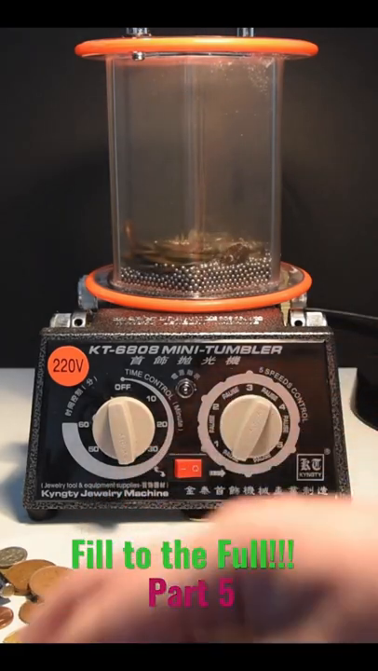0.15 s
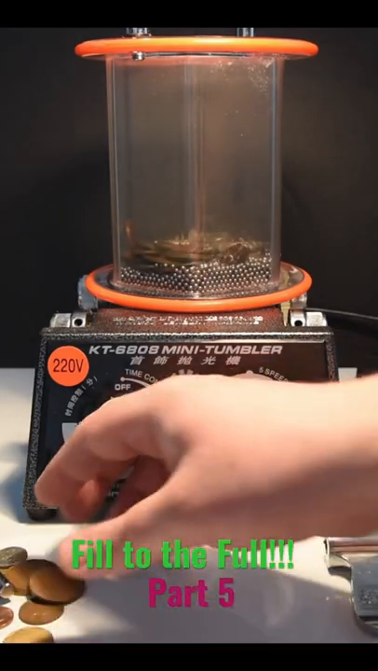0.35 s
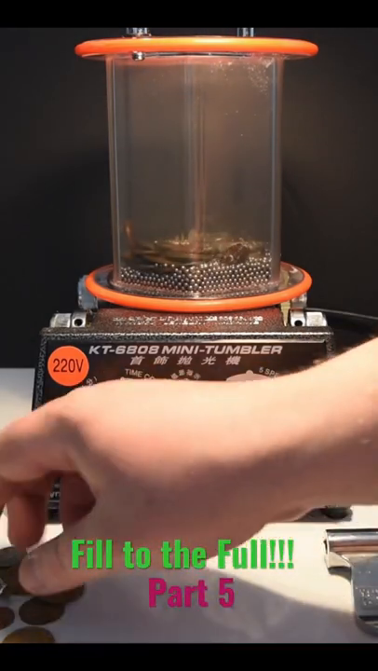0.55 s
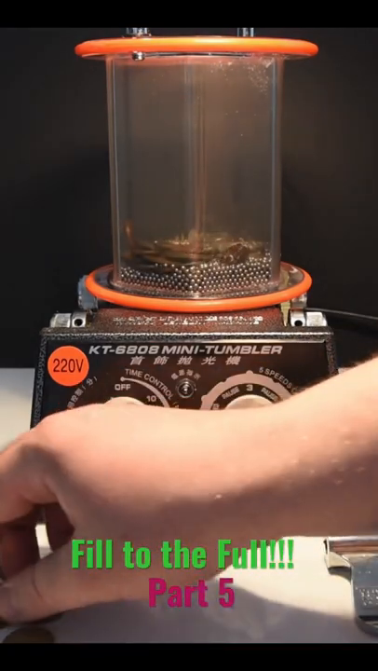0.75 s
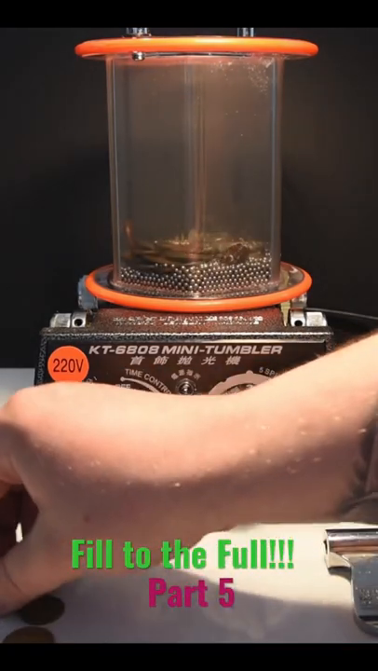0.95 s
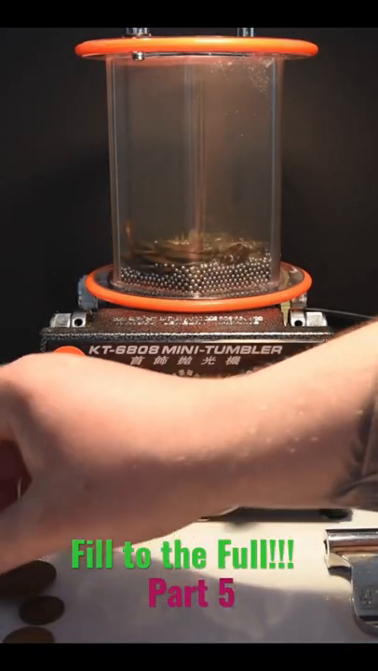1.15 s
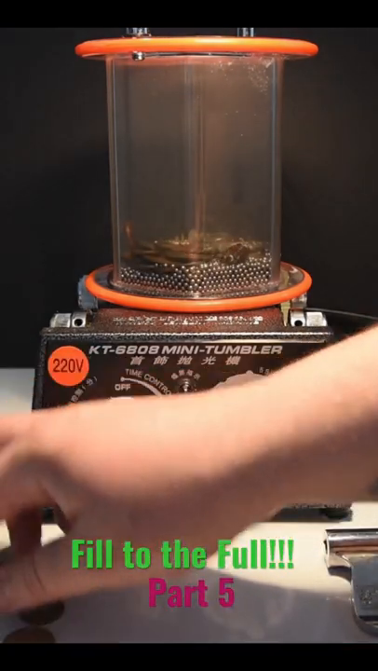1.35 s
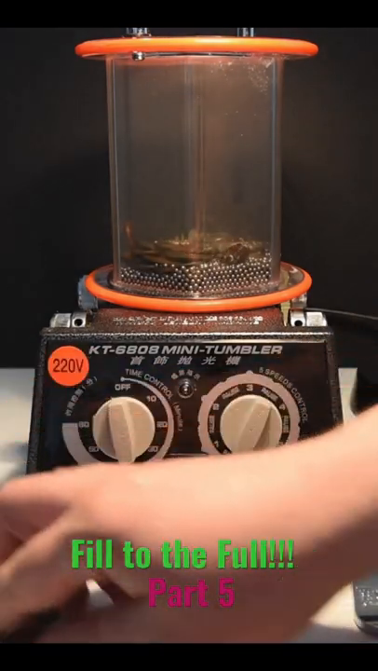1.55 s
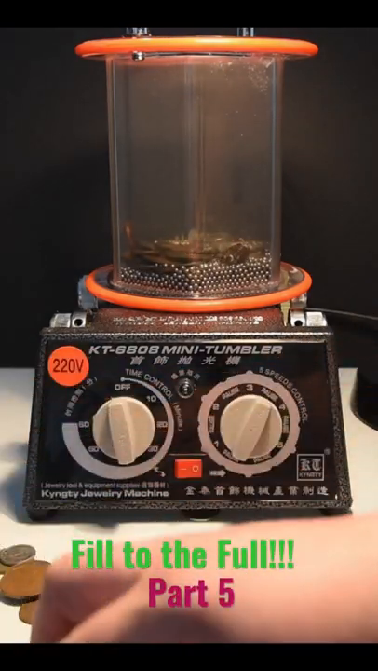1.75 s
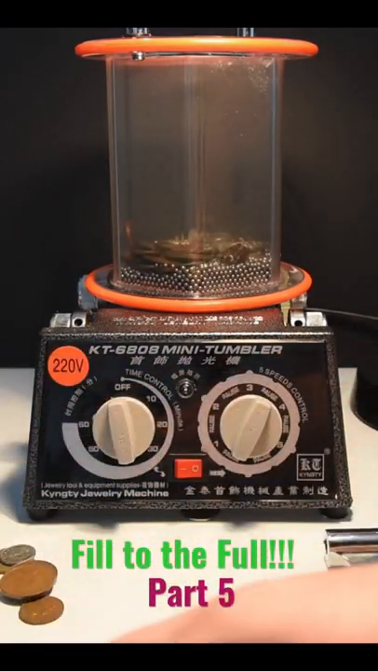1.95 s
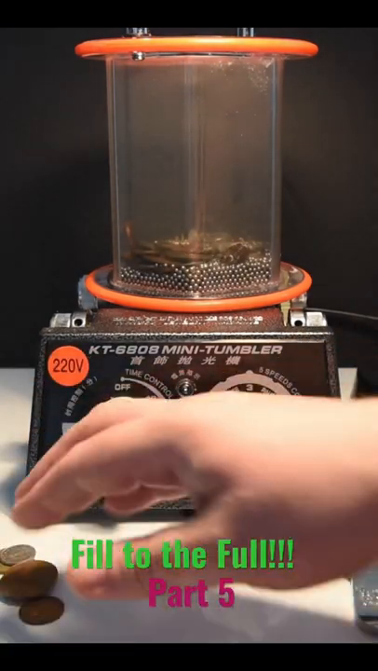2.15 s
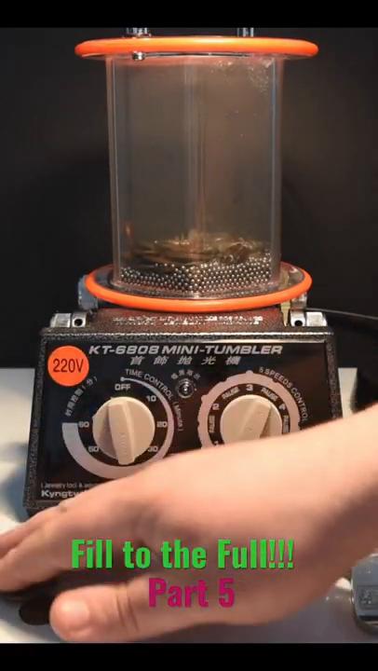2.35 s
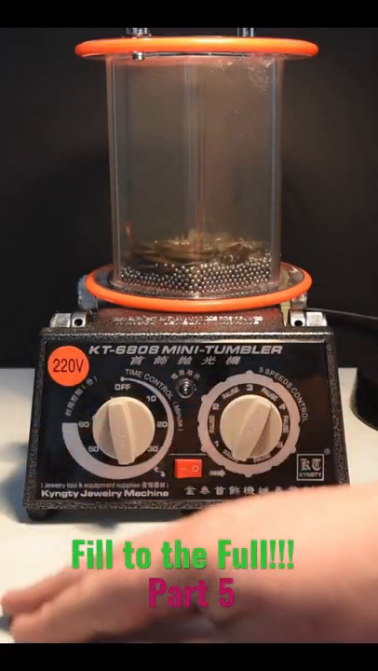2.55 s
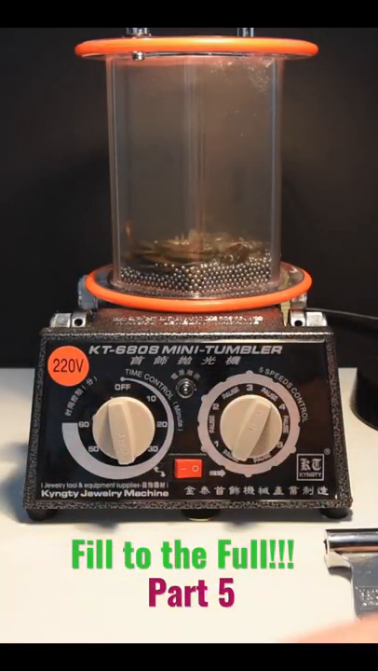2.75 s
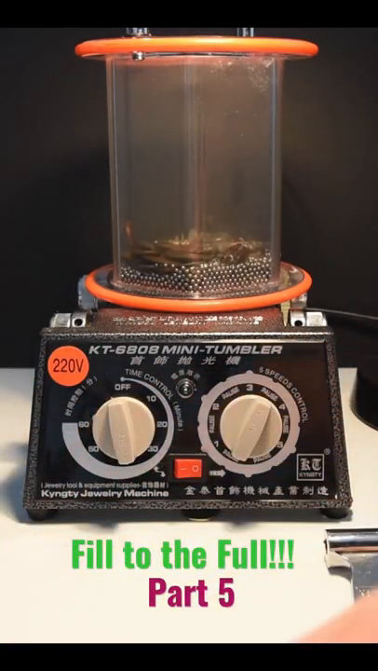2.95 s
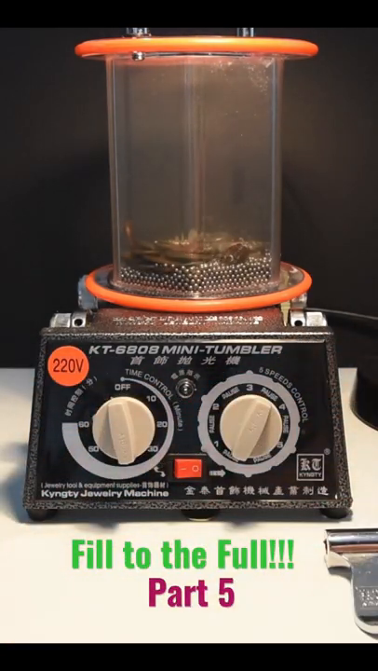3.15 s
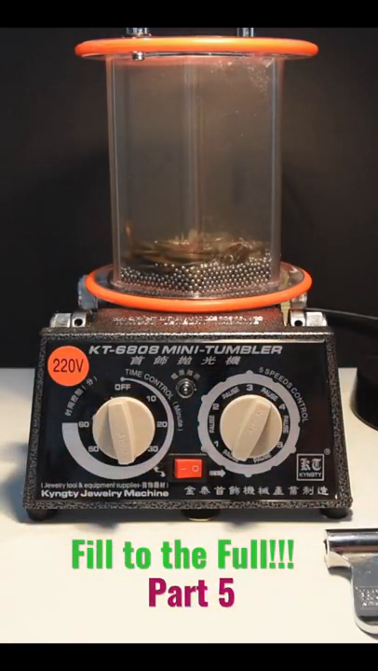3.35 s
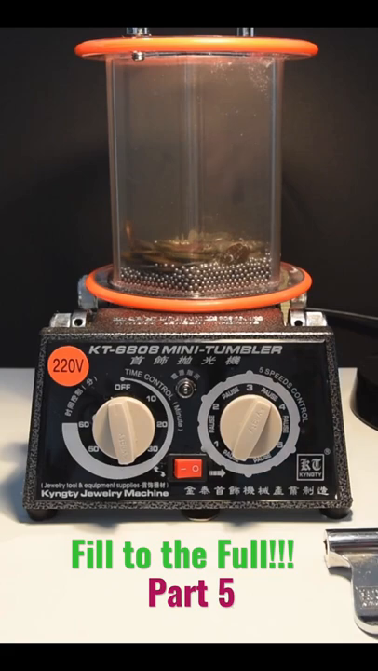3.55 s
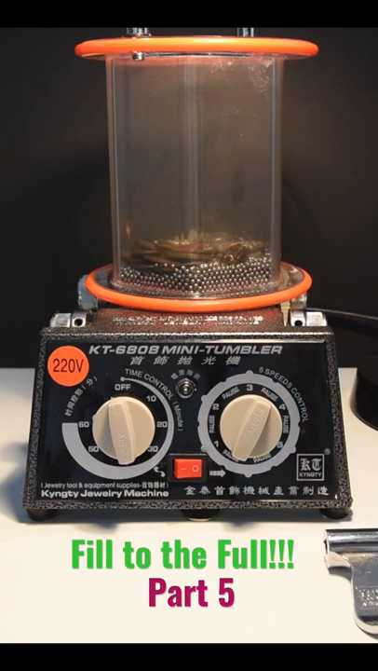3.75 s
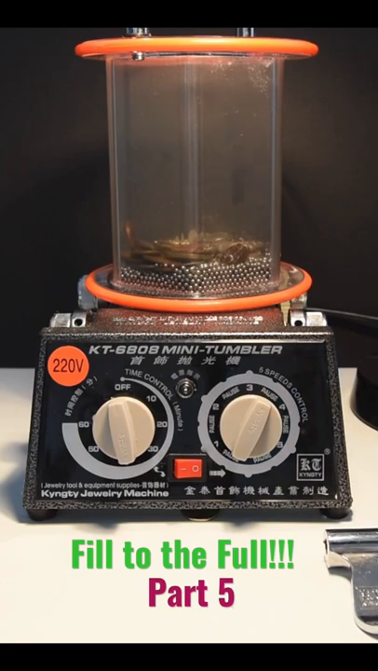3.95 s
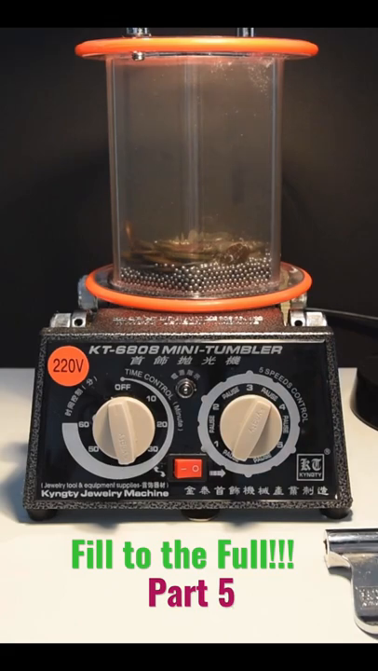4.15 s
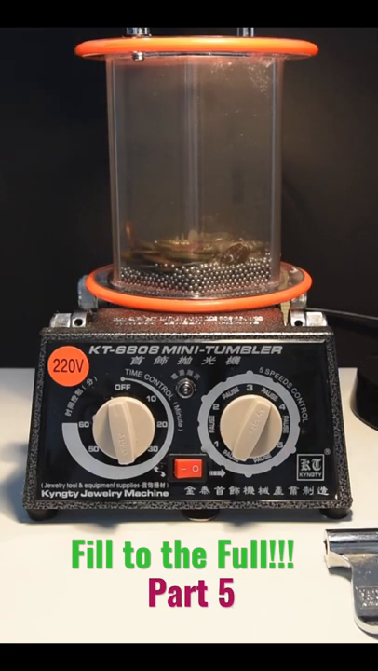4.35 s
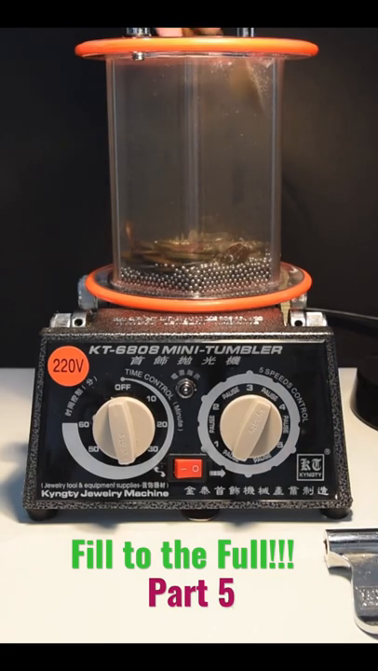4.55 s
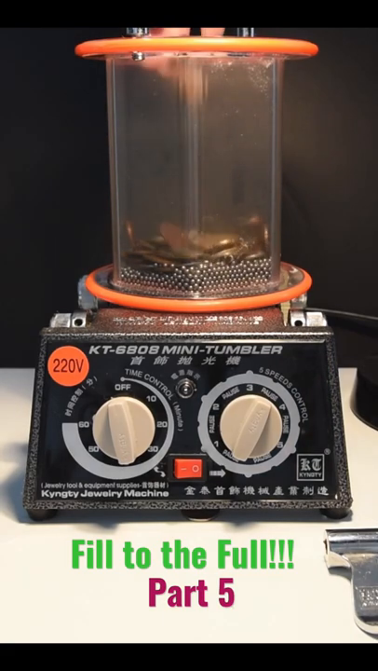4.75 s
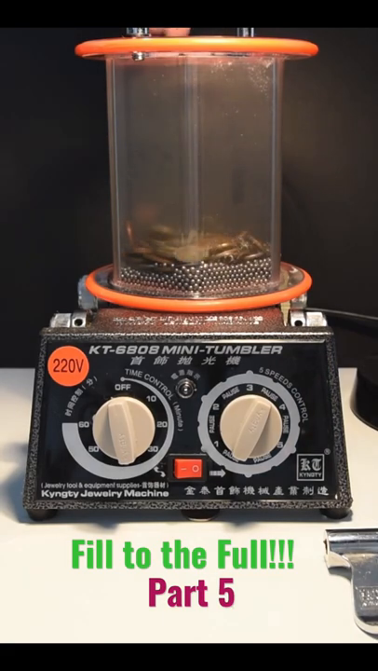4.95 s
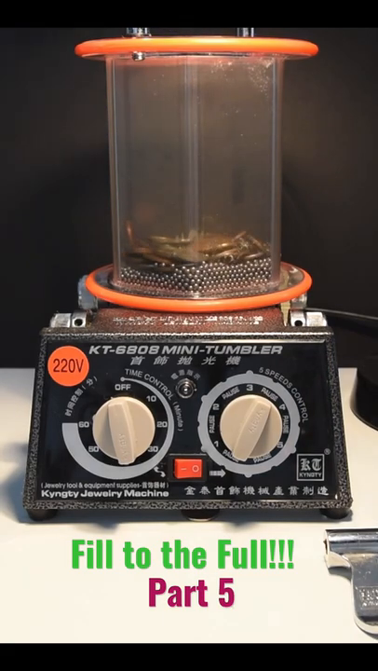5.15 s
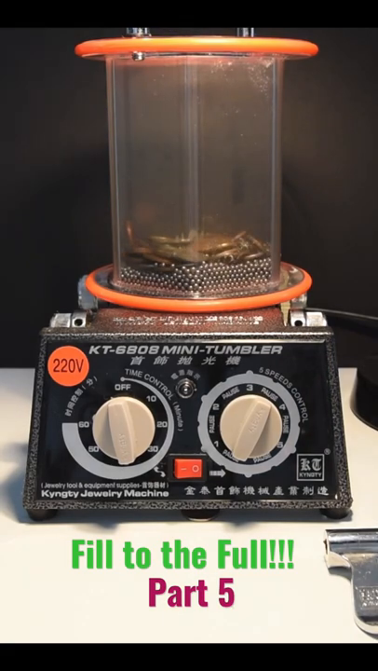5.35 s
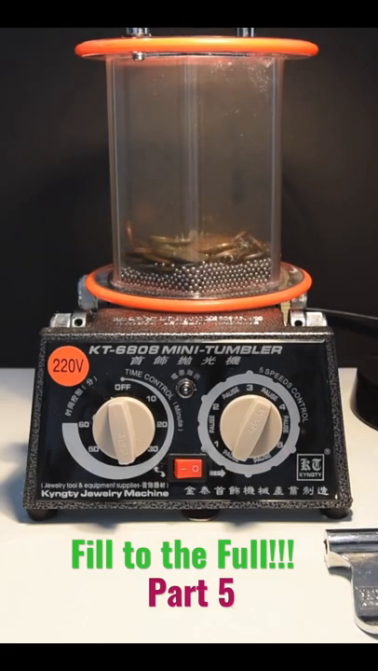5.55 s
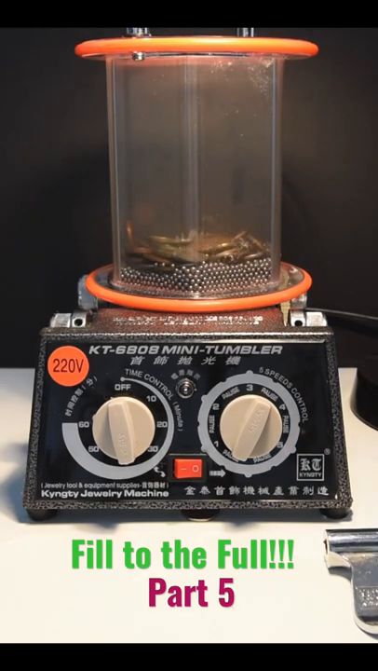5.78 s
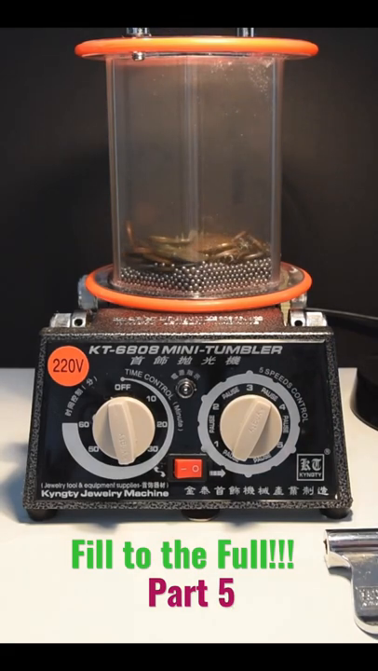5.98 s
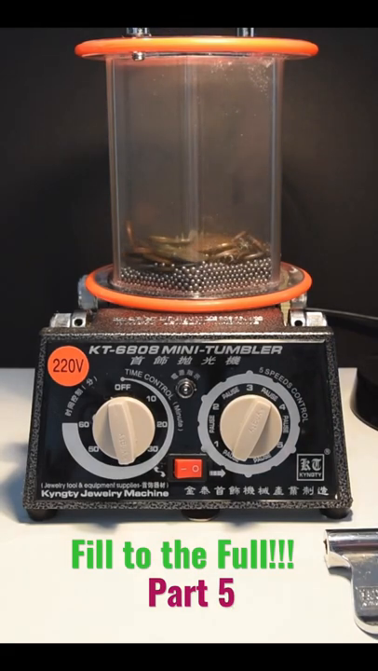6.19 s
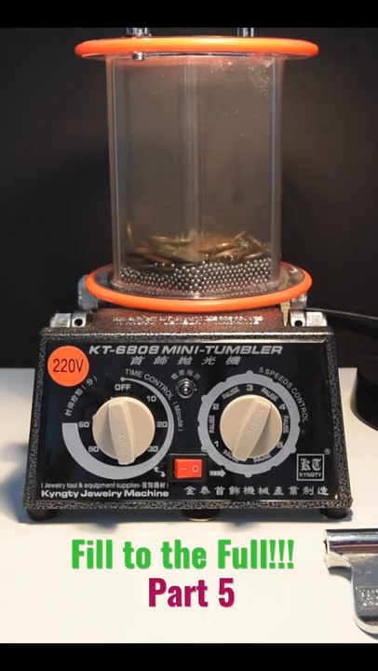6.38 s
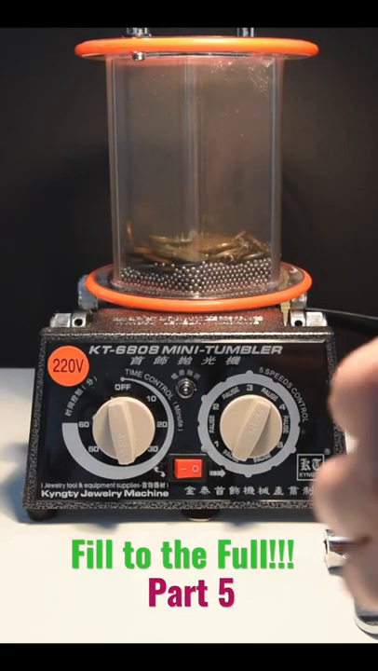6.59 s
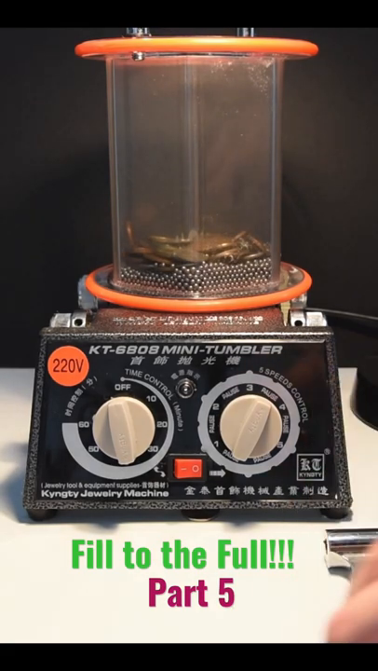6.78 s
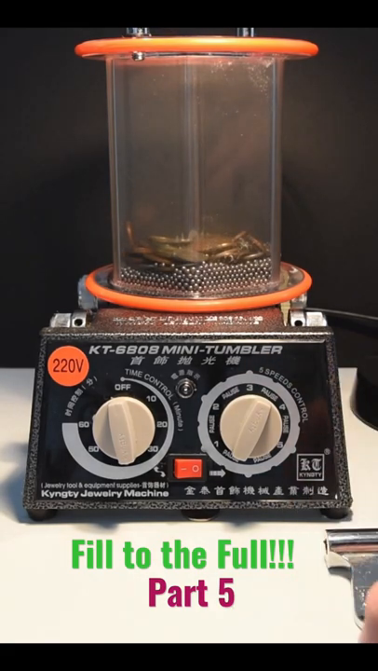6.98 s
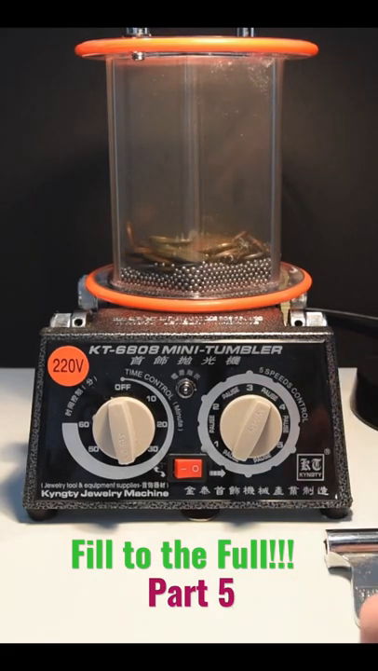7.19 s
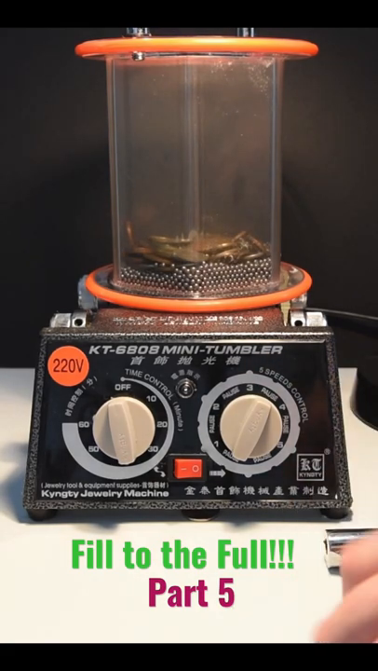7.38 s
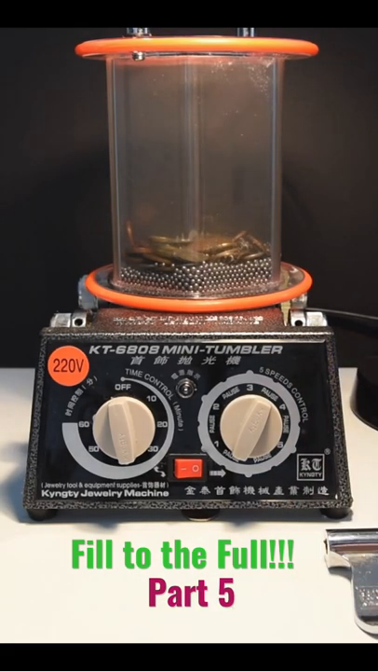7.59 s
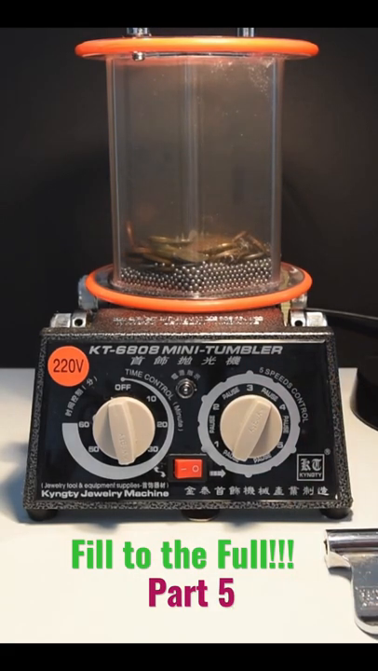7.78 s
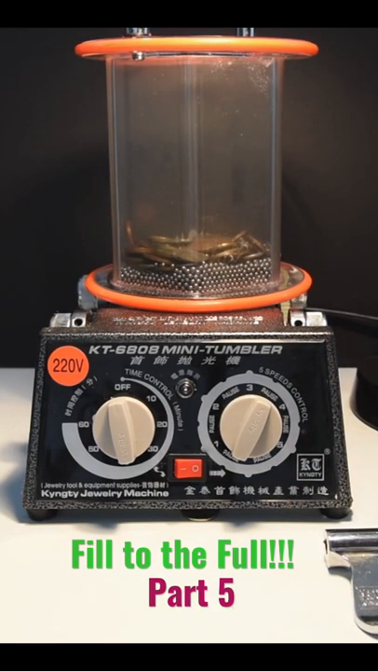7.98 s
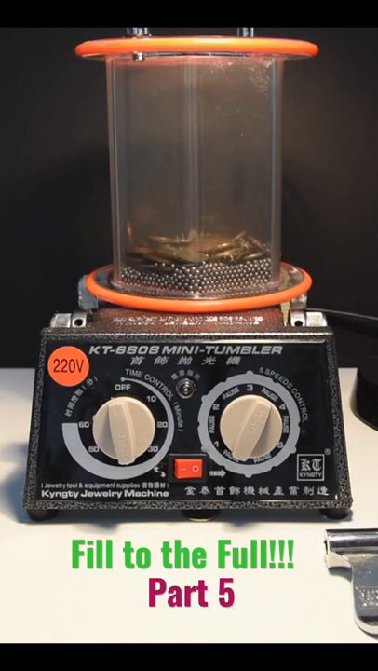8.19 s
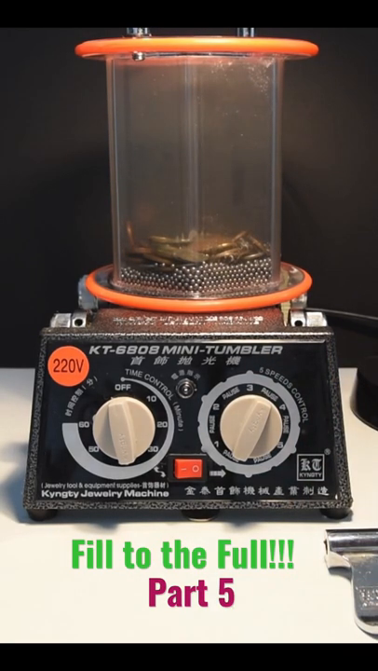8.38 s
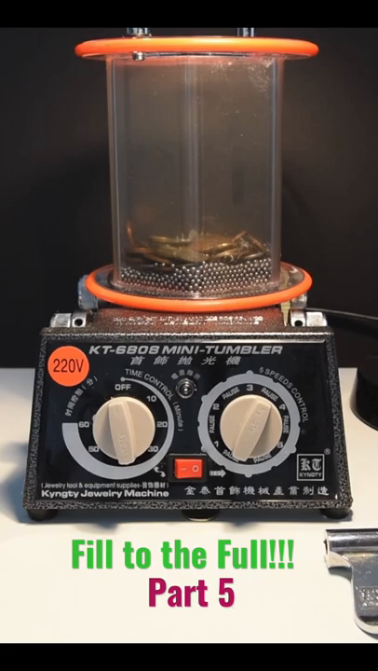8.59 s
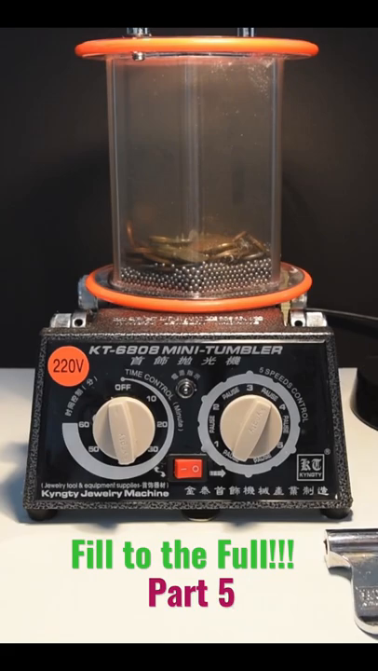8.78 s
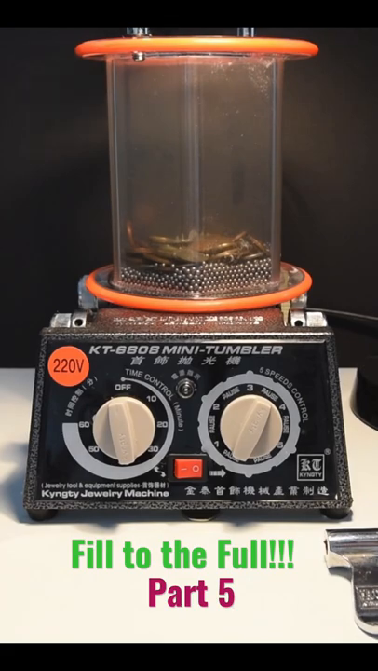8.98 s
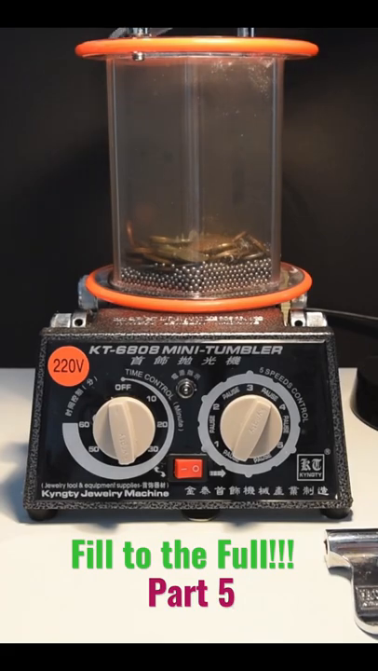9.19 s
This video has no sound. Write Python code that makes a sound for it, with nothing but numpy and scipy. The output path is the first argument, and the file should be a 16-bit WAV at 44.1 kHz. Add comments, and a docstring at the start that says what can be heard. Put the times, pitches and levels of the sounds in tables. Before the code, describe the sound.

Coins clink and scrape on a desk among hand knocks, jingle in the hand, then pour clattering onto metal pellets in a plastic barrel.

```python
"""Coins scrape together on a desk, jingle in a hand and pour onto steel pellets in a plastic barrel,
among knocks on the desk, over a low rumble from outside, microphone hiss and a thin whine.
Coins, desk and barrel are sums of dying modes excited by blows or random grains; cracks, thuds and
rubbing are coloured noise. A small quiet room adds a tail; a close microphone pair hears it all."""
import sys
import numpy as np
from scipy import signal
from scipy.io import wavfile
from scipy.ndimage import uniform_filter1d

SR = 44100
rng = np.random.default_rng(int(sys.argv[2]) if len(sys.argv) > 2 else 0)


def to_wav(sig):
    """Store sig (one row per channel, or 1-D mono) as 16-bit WAV at the path in sys.argv[1].

    Samples outside -1..1 are clipped; the rate is SR.
    """
    pcm = np.clip(np.atleast_2d(sig), -1, 1) * 32767
    pcm = np.round(pcm).astype(np.int16)
    wavfile.write(sys.argv[1], SR, pcm.T)  # frames by channels


N = 407029  # samples


def gain_of(db):
    """Decibel law: amplitude is ten to the power dB / 20."""
    return 10 ** (np.asarray(db) / 20)


def evened(x):
    """Power normalisation: scale to rms 1."""
    return x / np.sqrt(np.mean(x ** 2) + 1e-20)


def read(points, hz):
    """Logarithmic pitch scale: interpolate a curve over log frequency."""
    f, value = np.transpose(points)
    return np.interp(np.log(hz + 1), np.log(f + 1), value)


def add(mix, s, sound, pan_db):
    """Superposition: add a sound at s seconds, with a level difference between the sides."""
    part = mix[:, round(s * SR):][:, :sound.shape[1]]
    part += sound[:, :part.shape[1]] * gain_of([[pan_db / 2], [-pan_db / 2]])


def causal(points):
    """Minimum phase: the response with this spectrum whose energy comes earliest, energy 1."""
    log_gain = np.log(gain_of(read(points, abs(np.fft.fftfreq(2048, 1 / SR)))))
    h = np.fft.ifft(np.exp(np.conj(signal.hilbert(log_gain)))).real[:1024]
    return h / np.linalg.norm(h)


def ring(hz, db, t60, t, lag=0):
    """Modal superposition: a sum of exponentially dying sines; lag shifts their phases."""
    envelopes = gain_of(db[:, None] - 60 * t / t60[:, None])
    return (envelopes * np.sin(2 * np.pi * hz[:, None] * t + lag)).sum(0)


def nearest(hz, near_hz, fall_db):
    """Selective excitation: a blow that favours one pitch drives distant modes less, in dB."""
    return -fall_db * abs(np.log2(hz / near_hz)) ** .5


def grains(per_s, spread_db):
    """Shot noise: sparse clicks of random sign on two sides; a few are large."""
    size = gain_of(spread_db * np.minimum(rng.exponential(1, (2, N)), 4))
    size = size * rng.choice([-1., 1.], (2, N))
    return size * (rng.random((2, N)) < per_s / SR)


def spread(x, cross):
    """Crosstalk: each side also hears a share of the other; rms 1."""
    return evened(x + cross * x[::-1])


def burst(colour, noise, t60, same):
    """Transient contact noise: coloured, partly alike on two sides, dying fast, peak 1."""
    pair, same = noise.reshape(2, -1), np.clip(same, 0, 1)
    pair = np.array([pair[0], same * pair[0] + np.sqrt(1 - same ** 2) * pair[1]])
    t = np.arange(pair.shape[1]) / SR
    x = signal.oaconvolve(pair * gain_of(-60 * t / t60), causal(colour)[None])[:, :len(t)]
    return x / abs(x).max()


def gestures(rows, rise_s, fade_db_per_s, column=None):
    """Power addition of overlapping gestures: rise, even drift, fade; column adds its dB."""
    t, power = np.arange(N) / SR, np.zeros(N)
    for row in rows:
        start, length, level_db, change_db = row[:4]
        since = t - start
        db = level_db + change_db * np.clip(since / max(length, 1e-3), 0, 1)
        db = db - fade_db_per_s * np.maximum(since - length, 0)
        share_db = row[column] if column else 0
        power += (np.clip(since / max(rise_s, 1e-4), 0, 1) * gain_of(db + share_db)) ** 2
    return np.sqrt(power)


# Likeness of the two sides. Each row: frequency in Hz, left-right correlation.
LIKENESS = [(60, 0.94), (180, 0.989), (550, 0.69), (1650, 0.42), (4970, -0.25), (15000, 0.16)]


def wash(points, patchy_db):
    """Partly coherent noise: random short-time spectra with drifting patches, rms 1."""
    frames, hz = N // 512 + 5, np.fft.rfftfreq(2048, 1 / SR)
    a, b, c, d, patches = rng.standard_normal((frames, 1025, 5)).T
    patches = evened(uniform_filter1d(uniform_filter1d(patches, 16, 0), 6, 1))
    same = np.clip(read(LIKENESS, hz), -1, 1)[:, None]
    left = a + 1j * b
    z = np.array([left, same * left + np.sqrt(1 - same ** 2) * (c + 1j * d)])
    z *= gain_of(read(points, hz)[:, None] + patchy_db * patches)
    return evened(signal.istft(z, nperseg=2048, noverlap=1536)[1][:, :N])


# Spectra of hiss and rumble. Each row: frequency in Hz, relative density in dB.
HISS_SPECTRUM = [(15, -44), (25, -21), (48, -5), (111, -6.5), (146, 3), (207, -10), (377, -11),
                 (597, -34.5), (783, -34.5), (1210, -20), (3040, -24.5), (7640, -23), (10000, -16.5),
                 (14700, -39.5), (16300, -50)]
RUMBLE_SPECTRUM = [(15, -36.5), (25, -1), (102, -18.5), (136, 0.5), (204, -8), (238, -5.5), (364, -13.5),
                   (624, -10.5), (728, -11), (936, -9.5), (1200, -18), (1500, -22.5), (3250, -43),
                   (5500, -120)]
# Swell of the rumble. Each row: time in seconds, level in dB.
RUMBLE_SWELL = [(0.0, -58), (1.0, -49.5), (1.85, -54), (2.3, -61), (4.5, -67), (6.042, -69), (7.6, -60.5),
                (8.601, -53.5), (9.23, -54.5)]
# Whine of electronics. Each row: frequency in Hz, bandwidth in Hz, a level in dB that is not used.
WHINE_BAND = [(10200, 78, 0)]
HISS_DB, WHINE_DB = -63.5, -79.5


def background():
    """Stationary noise, hiss and a narrow-band whine, under a rumble that swells and fades."""
    hz, width, _ = WHINE_BAND[0]
    resonance = signal.iirpeak(hz, hz / max(width, 5), SR)
    whine = signal.lfilter(*resonance, rng.standard_normal((2, N)))
    swell_db = np.interp(np.arange(N) / SR, *np.transpose(RUMBLE_SWELL))
    rumble = gain_of(swell_db) * wash(RUMBLE_SPECTRUM, 2.0)
    hiss = gain_of(HISS_DB) * wash(HISS_SPECTRUM, 1.8)
    return hiss + gain_of(WHINE_DB) * spread(whine, .3) + rumble


# Reverberation. Each row: frequency in Hz, time to fall by 60 dB in seconds.
ROOM_DECAY = [(150, 0.58), (600, 0.23), (2000, 0.39), (6000, 0.35), (15000, 0.28)]


def room(x):
    """Diffuse reverberation: random taps, one in every 20 samples, each band dying at its own speed."""
    taps = np.zeros((2, SR // 2))
    at = np.arange(120, SR // 2 - 20, 20) + rng.integers(0, 20, (2, (SR // 2 - 121) // 20))
    np.put_along_axis(taps, at, rng.choice([-1., 1.], at.shape), 1)
    hz, t, z = signal.stft(taps, SR, nperseg=256)
    tail = signal.istft(z * gain_of(-60 * t / read(ROOM_DECAY, hz)[:, None]), SR, nperseg=256)[1]
    low = signal.sosfiltfilt(signal.butter(2, 600, fs=SR, output="sos"), tail)
    tail = tail - low + low[0]  # long waves reach both ports alike
    return signal.oaconvolve(x.mean(0)[None], tail / np.linalg.norm(tail[0]), axes=1)[:, :N]


# Taps of a metal tool rocking on the desk. Each row: start in seconds, level in dB before an offset.
TAPS = [(7.3156, -11.5), (7.369, -26), (9.1165, -14), (9.1393, -23)]
# Modes of the tool. Each row: frequency in Hz, relative level in dB, 60 dB decay time in seconds.
TOOL_MODES = [(1120, -14, 0.035), (2040, -16, 0.028), (2994, 1, 0.02), (3957, -12, 0.047),
              (4460, -0.5, 0.017), (5600, -12, 0.035), (7070, -0.5, 0.02)]


def tool():
    """Modes of a stiff body: short rings, a little different at each tap."""
    out, t = np.zeros((2, N)), np.arange(round(.1 * SR)) / SR
    hz, db, t60 = np.transpose(TOOL_MODES)
    for (s, level_db), luck in zip(TAPS, rng.standard_normal((len(TAPS), len(TOOL_MODES)))):
        tone = ring(hz, db - 17.0 + 0.28 * luck, t60, t)
        add(out, s, gain_of(level_db) * np.array([tone, tone]), -3.0)
    return out


# Blows on the desk. Each row: start in seconds, level in dB, favoured frequency in Hz, then
# thud and slap in dB over that level, and boom of the whole desk in dB before an offset.
BLOWS = [(0.655, -25.5, 614, -13.5, 7.5, -37), (0.674, -38, 604, -25, 8, -27),
         (0.757, -25, 676, -10, -0.5, -38), (0.868, -29, 676, -9, 4, -33),
         (1.144, -12.5, 248, -10.5, -3, -18), (1.422, -26, 664, -7, 8.5, -32),
         (1.507, -25, 580, -14, 1.5, -26), (1.873, -21, 690, -20.5, 2, -42),
         (2.375, -20.5, 720, -18.5, -3.5, -27), (3.278, -22.5, 615, -7.5, -2.5, -27),
         (3.496, -45, 780, -9.5, -2, -12), (3.526, -44.5, 357, 1.5, 0, -12),
         (6.341, -16.5, 467, -2.5, -11, -25), (7.3137, -17, 357, -12.5, -0.5, -37),
         (7.37, -37.5, 272, -2.5, 8.5, -19), (7.576, -15, 360, -13, -26, -12),
         (8.249, -42.5, 578, -0.5, 5.5, -18), (9.117, -22.5, 440, -6.5, 4.5, -27),
         (9.14, -34, 426, -9.5, -8, -26)]
# Modes of the desk. Each row: frequency in Hz, relative level in dB, decay time in seconds before scaling.
DESK_MODES = [(144, 0, 0.21), (186, -2.5, 0.11), (280, -10, 0.058), (312.4, 10, 0.18), (385.3, 17, 0.085),
              (429.5, 8, 0.085), (550, 0, 0.068), (615, 15, 0.051), (788, 23, 0.028), (1101, 20, 0.092),
              (2070, -39, 0.054), (3100, 5, 0.059)]
# Spectra of thud and slap. Each row: frequency in Hz, relative density in dB.
THUD_SPECTRUM = [(59, -24.5), (100, -21), (156, -5.5), (305, -9.5), (444, -7), (705, -8.5), (822, -11),
                 (1140, -14), (6000, -32.5), (7800, -85.5), (13200, -120)]
SLAP_SPECTRUM = [(880, -62.5), (1500, -21), (2300, 11), (4780, 0.5), (9060, 4.5), (14600, -11),
                 (15400, -15.5), (16300, 7.5)]
RING_LENGTH, LINGER_PER_THUD = 1.45, 0.031  # a fleshy blow that thuds more lasts longer


def knocks():
    """Impact on a plate: slap of contact noise, dense thud, and the modes nearest the blow's pitch."""
    out, t = np.zeros((2, N)), np.arange(round(.3 * SR)) / SR
    hz, db, t60 = np.transpose(DESK_MODES)
    draws = rng.standard_normal((len(BLOWS), len(DESK_MODES) + 32000))
    for (s, level_db, near_hz, thud_db, slap_db, boom_db), draw in zip(BLOWS, draws):
        luck, low, high = np.split(draw, [len(hz), len(hz) + 20000])
        length = max(RING_LENGTH + LINGER_PER_THUD * thud_db, .1)
        share_db = db + nearest(hz, near_hz, 23) + 3.34 * luck
        share_db[0] = boom_db + 10.5  # the whole desk flexes as far as the blow is heavy
        body = ring(hz, share_db - 13.0, 0.53 * t60 * length, t) * (1 - np.exp(-t / 0.0035))
        thud = burst(THUD_SPECTRUM, low, 0.16 * length, 0.87)
        slap = burst(SLAP_SPECTRUM, high, 0.063 * length, 0.2)
        add(out, s, gain_of(level_db) * np.array([body, body]), -1.5)
        add(out, s, gain_of(level_db + thud_db) * thud, -1.5)
        add(out, s, gain_of(level_db + slap_db) * slap, -1.5)
    return out


# Coins landing in the barrel, first heap, then stream. Each row: start in seconds, length in
# seconds, level in dB, change over the length in dB.
LANDINGS = [(4.646, 0.057, -31.5, -12.5), (4.71, .33, -43, 1.5)]
# Modes of the barrel. Each row: frequency in Hz, relative level in dB, 60 dB decay time in seconds.
BARREL_MODES = [(359.5, -4.5, 0.045), (465, -7.5, 0.019), (780, 3, 0.0028), (1124, -2, 0.019),
                (1274, -3.5, 0.026), (1845, 2.5, 0.0066)]


def barrel():
    """Forced vibration: each landing thumps the wall and the air of the barrel."""
    hz, db, t60 = np.transpose(BARREL_MODES)
    t = np.arange(round(.12 * SR)) / SR
    thump = np.gradient(ring(hz, db - 20 * np.log10(hz), t60, t))  # only a changing push radiates
    hits = spread(grains(500, 5.4), 0.85) * gestures(LANDINGS, rise_s=0.004, fade_db_per_s=297)
    return signal.oaconvolve(hits, thump[None] / np.linalg.norm(thump))[:, :N]


# Coins and skin dragged on the desk. Each row: start in seconds, length in seconds, level in dB,
# change over the length in dB, extra treble in dB, desk drone in dB relative to the level.
STROKES = [(0.0, 0.035, -47.5, 3, 3, -4), (0.66, 0.0058, -34.5, -2, 5, 8.5),
           (0.78, 0.069, -61, 12, -7, 5.5), (0.972, 0.17, -50.5, -22, -4, 6.5),
           (1.15, 0.024, -35.5, -12, 9.5, 4.5), (1.425, 0.008, -39.5, -6.5, -3, -1),
           (1.506, 0.018, -42.5, -3.5, 5, 0), (1.55, 0.39, -51, 2.5, -1, 0.5),
           (2.38, 0.012, -35, -12.5, 11, 1.5), (2.44, 0.22, -61, 11, -3, 10),
           (2.65, 0.17, -43.5, -0.5, 1.5, -2.5), (6.36, 0.0092, -49, -6, -13.5, 0),
           (7.33, 0.48, -58.5, -18.5, 7, 5), (7.59, 0.42, -59, -13.5, 7.5, -3)]


def strokes(column=None):
    """Envelope of friction: the gain of the strokes over time."""
    return gestures(STROKES, rise_s=0.0017, fade_db_per_s=331, column=column)


# Spectrum of the rub. Each row: frequency in Hz, relative density in dB.
SCRAPE_SPECTRUM = [(530, -30), (900, 3.5), (1130, -2), (1550, -3), (2650, -4), (5970, -13.5), (9120, -11.5),
                   (13400, -21.5), (16300, -41)]


def slide():
    """Stick-slip friction: coarse slips; catching rims add treble and the desk top drones."""
    judder = evened(uniform_filter1d(rng.standard_normal(N), 500))
    slips = spread(grains(2000, 2.2), 0.11) * gain_of(3.5 + 1.47 * judder)
    rub = signal.oaconvolve(slips, causal(SCRAPE_SPECTRUM)[None])[:, :N]
    high = signal.sosfilt(signal.butter(2, 5000, "high", fs=SR, output="sos"), rub)
    drone = signal.lfilter(*signal.iirpeak(680, 3.5, SR), slips.mean(0) * strokes(column=5))
    return (rub - high) * strokes() + high * strokes(column=4) + gain_of(14.5) * drone


# Shakes of the handful. Each row: start in seconds, length in seconds, level in dB, change over
# the length in dB, dull clacks and coin ringing in dB relative to the level.
SHAKES = [(0.098, 0.11, -32, -14, -18, -1), (0.231, .04, -34, -12.5, -32, -5),
          (1.997, .18, -30.5, -11.5, -33, -10), (2.849, 0.17, -27, -9.5, -24, 4.5),
          (3.104, 0.079, -43.5, 6, -19, -16), (3.188, 0.056, -34.5, 4.5, -15.5, -14),
          (3.265, .08, -43, 9, 0, -11), (3.856, .03, -56.5, 18.5, -1.5, -14),
          (3.892, .2, -47.5, -6.5, -1.5, -8), (4.134, .035, -49, 21.5, -18, -21),
          (4.181, .03, -25, -9.5, -17, -2.5), (4.238, .03, -37.5, -16, -14, -8),
          (4.392, .09, -49.5, 6, -14, -14.5), (4.479, 0.13, -26.5, -5, -21.5, -3),
          (4.608, 0.27, -23, -7.5, -3, -1.5), (4.866, .05, -25.5, -7.5, -15.5, 8.5),
          (4.922, .14, -25.5, -13, -7, 0.5)]


def shakes(column=None):
    """Envelope of agitation: the gain of the shakes over time."""
    return gestures(SHAKES, rise_s=.005, fade_db_per_s=549.5, column=column)


# Contact of metal on metal. Each row: frequency in Hz, relative density in dB.
CRACK_SPECTRUM = [(710, -65), (1200, -52), (3500, -20.5), (3950, -16), (8210, -2), (9050, -2), (12800, -13),
                  (14600, -11), (15100, -8.5), (16300, -48.5)]


def chinks(count, per_s, low_hz, high_hz, t60):
    """Contact damping: coins pressed among others ring very briefly, each at its own pitch."""
    hits = spread(grains(per_s, 6.1), 0.51) * shakes()
    t, which = np.arange(round(.06 * SR)) / SR, rng.integers(0, count, N)
    out = np.zeros((2, N))
    for k, (place, damping) in enumerate(rng.random((count, 2))):
        hz = low_hz * (high_hz / low_hz) ** ((k + place) / count)
        tone = gain_of(-60 * t / (t60 * (.5 + damping))) * np.sin(2 * np.pi * hz * t)
        tone *= gain_of(read(CRACK_SPECTRUM, hz)) / np.linalg.norm(tone)
        out += signal.oaconvolve(hits * (which == k), tone[None])[:, :N]
    return out


# Flat faces meeting. Each row: frequency in Hz, relative density in dB.
CLACK_SPECTRUM = [(900, -32.5), (2300, -2), (2900, -0.5), (4200, 3), (4800, 1.5), (5600, -0.5), (9000, -13)]
# Modes of the coins in the handful. Each row: frequency in Hz.
COIN_PITCHES = [4790, 5600, 6930, 7560, 8190, 8380, 8535, 9627, 10300, 10640, 11005, 11095, 11190, 11825,
                12917, 14493, 14720, 14888]
# The same modes in order. Each row: relative level in dB, 60 dB decay time in seconds before scaling.
COIN_MODES = [(-8.5, 0.18), (-15, 0.0973), (-18, 0.1), (-3, 0.28), (-2.5, 0.067), (-14.5, 0.2),
              (-4.5, 0.246), (-10.5, 0.054), (-1.5, .1), (-9.5, 0.029), (6, 0.11), (1.5, 0.16),
              (-6.5, 0.11), (-1.5, 0.15), (-6, .08), (1, .1), (-20, 0.13), (-4.5, 0.15)]


def jingle():
    """Random impacts: small cracks and duller clacks in clumps; some hits set a coin mode ringing."""
    clumps = gain_of(1.3 * evened(uniform_filter1d(rng.standard_normal(N), 350)))
    cracks = spread(grains(2200, 4.3), 0.45) * clumps * shakes()
    cracks = signal.oaconvolve(cracks, causal(CRACK_SPECTRUM)[None])
    clacks = spread(grains(600, 0.65), 0.5) * clumps * shakes(column=4)
    clacks = signal.oaconvolve(clacks, causal(CLACK_SPECTRUM)[None])
    out = gain_of(-3.0) * (gain_of(-1.0) * cracks + clacks)[:, :N]
    ringing = evened(grains(400, 1.9)) * clumps * shakes(column=5)
    t, which = np.arange(round(.25 * SR)) / SR, rng.integers(0, len(COIN_MODES), ringing.shape)
    for k, (hz, (db, t60)) in enumerate(zip(COIN_PITCHES, COIN_MODES)):
        tone = gain_of(-60 * t / (.45 * t60)) * np.sin(2 * np.pi * hz * t)
        rung = signal.oaconvolve(ringing * (which == k), tone[None] / np.linalg.norm(tone))[:, :N]
        out += gain_of(db - 1.5) * (rung + 0.35 * np.roll(rung[::-1], 3, axis=1))
    return out


# Coin against coin. Each row: start in seconds, level in dB, favoured frequency in Hz,
# ringing in dB relative to the level.
COIN_HITS = [(0.0267, -23.5, 14900, -17), (0.1006, -18, 14900, -7), (0.1087, -9, 7770, -15),
             (0.1399, -3, 11100, -14), (0.15, -22, 14650, -6), (0.1668, -17, 11080, -3),
             (0.244, -10, 11100, -6), (0.827, -51, 5550, 5), (1.1484, -18.5, 10500, -8),
             (1.221, -41, 5600, 0), (1.45, -46, 5600, 0), (1.5094, -33, 10620, -7),
             (1.6115, -20.5, 9300, -18), (1.665, -21.5, 8600, -19), (2.001, -11.5, 11000, -4),
             (2.0171, -8, 10900, -11), (2.031, -12, 10860, -7), (2.0794, -12.5, 11040, -11),
             (2.0993, -20, 11000, -10), (2.1434, -15.5, 8160, -16), (2.1713, -18, 11000, -15),
             (2.445, -29.5, 11100, -32), (2.844, -2.5, 10800, -21), (2.8624, -9, 8300, -5.5),
             (2.8977, -26, 8380, -4), (2.9161, -21, 8530, 0), (2.955, -22, 9000, 1),
             (3.0152, -16, 8650, -16), (3.1318, -25, 8800, -14), (3.1948, -19, 8170, -16),
             (3.23, -10.5, 10900, -23), (3.332, -26, 9300, -8), (3.781, -43, 7100, -13),
             (3.8806, -32.5, 11200, -2), (3.9454, -23.5, 11100, -23), (3.9895, -29.5, 8800, -21),
             (4.0346, -28, 6480, -23), (4.062, -28.5, 8400, -15.5), (4.159, -14.5, 8140, -28),
             (4.189, -12, 15160, -23), (4.2458, -9, 8400, -25), (4.4248, -24, 15070, -28.5),
             (4.4542, -21.5, 11100, -13.5), (4.4862, -9, 10900, -5), (4.563, -19, 11090, -11),
             (4.6122, -11.5, 7560, -7.5), (4.6222, -12, 7670, -17), (4.6334, -13, 7950, -17),
             (4.649, -15, 7420, -15), (4.663, -12.5, 7450, -12), (4.6804, -35, 10530, -14),
             (4.6981, 0, 8020, -13), (4.7084, -8, 11140, -16), (4.737, -11, 7300, -14.5),
             (4.7534, -23, 9620, 3.5), (4.8678, -12, 11040, -14), (4.928, -3.5, 12900, -17),
             (5.017, -17, 12460, -8)]
CLACK_DB = -5.5  # of a clink, over the dull share of the latest shake begun by then
DISC_RATIO = 1.735  # second over first mode of a free disc


def clinks():
    """Modal impact: a crack and a clack, then the coin rings; a gripped coin rings faint and short."""
    out, t, hz = np.zeros((2, N)), np.arange(round(.4 * SR)) / SR, np.array(COIN_PITCHES)
    db, t60 = np.transpose(COIN_MODES)
    draws = rng.standard_normal((len(COIN_HITS), 2 * len(COIN_MODES) + 4801))
    starts, dull_db = np.transpose(SHAKES)[[0, 4]]
    for (s, level_db, near_hz, ring_db), draw in zip(COIN_HITS, draws):
        latest_shake = max(np.searchsorted(starts, s + .01) - 1, 0)
        clack_db = CLACK_DB + dull_db[latest_shake]
        pan_db = 0.54 * draw[-1] - 0.6  # a small random level difference between the sides
        luck, lag, bright, dull = np.split(draw[:-1], [len(hz), 2 * len(hz), 2 * len(hz) + 2400])
        partners = [nearest(hz, near_hz * DISC_RATIO ** k, 89) - 11.0 * k for k in (0, 1)]
        share_db = db + np.max(partners, axis=0) + 3.2 * luck
        mode_db = share_db - share_db.max() + ring_db
        mode_t60 = t60 * np.clip(1.0 + ring_db / 28, .3, 1.3)
        left = ring(hz, mode_db, mode_t60, t)
        # random phases on the right make the ringing wide
        right = ring(hz, mode_db, mode_t60, t, 2.14 * lag[:, None])
        # a stamped disc splits each mode in two
        twins = ring(hz * (1 + 0.014 * lag), mode_db - 4.5, mode_t60, t)
        tone = np.array([left + twins, right - twins])
        add(out, s, gain_of(level_db) * tone, pan_db)
        add(out, s, gain_of(level_db - 1.5) * burst(CRACK_SPECTRUM, bright, .006, .45), pan_db)
        add(out, s, gain_of(level_db + clack_db) * burst(CLACK_SPECTRUM, dull, .03, .9), pan_db)
    return out


def scene():
    """Superposition of direct sound, reverberation and background."""
    pressed = chinks(count=24, per_s=1300, low_hz=4210, high_hz=14740, t60=0.048)
    coins = clinks() + jingle() + gain_of(-3.0) * pressed
    desk = slide() + knocks() + tool() + barrel()
    near = coins + desk + room(gain_of(-9.5) * coins + gain_of(-7.5) * desk)
    return near * gain_of([[-.6], [.6]]) + background()


def record(dry):
    """Saturation squeezes the loudest peaks; the treble falls steeply above 15 kHz to a band limit."""
    squeezed = 0.5 * np.tanh(dry / 0.37)
    fall_hz, fall_db = [0, 15000, 15500, 16200, SR / 2], [-4.0, -0.5, -17, -40.5, -40]
    soft = signal.firwin2(255, fall_hz, gain_of(fall_db), fs=SR)
    edge = signal.firwin(511, 16300, window=("kaiser", 9), fs=SR)
    return signal.oaconvolve(squeezed, np.convolve(soft, edge)[None], "same")


dry = scene()
out = record(dry)
to_wav(out)
```